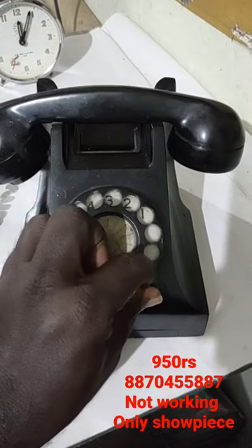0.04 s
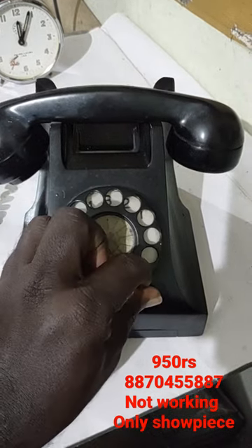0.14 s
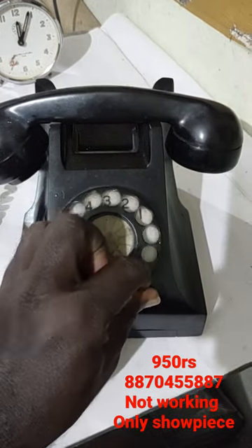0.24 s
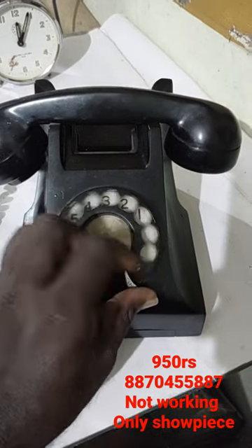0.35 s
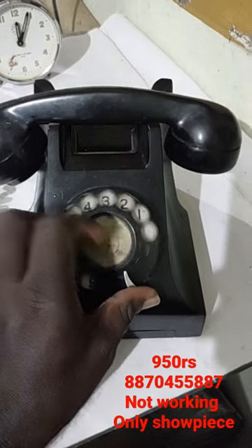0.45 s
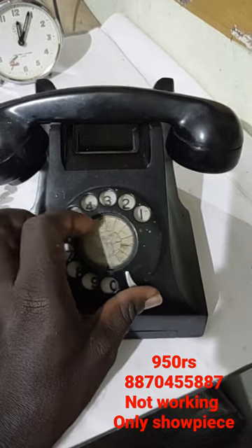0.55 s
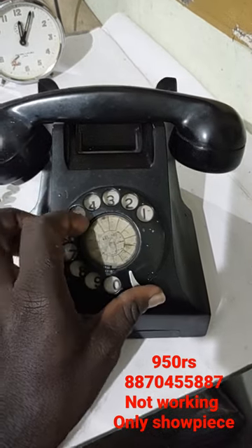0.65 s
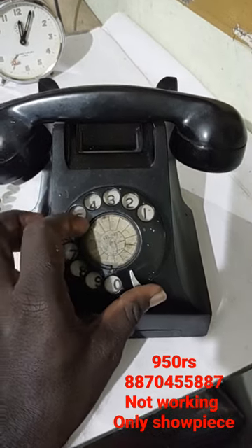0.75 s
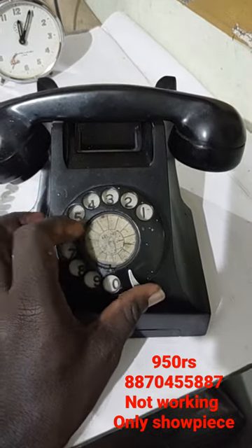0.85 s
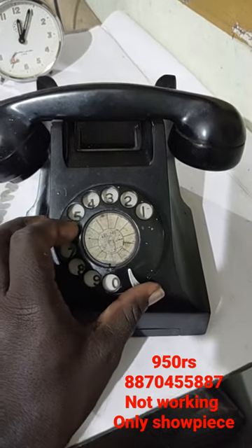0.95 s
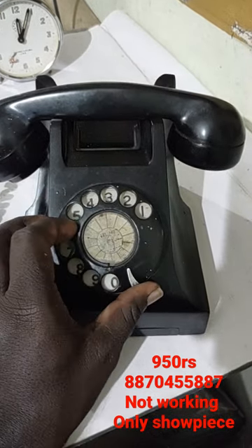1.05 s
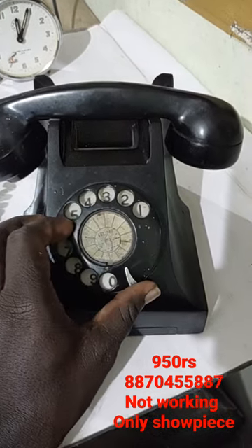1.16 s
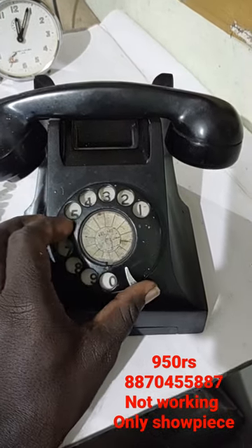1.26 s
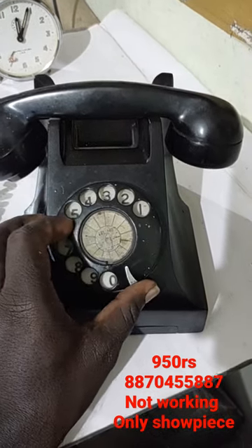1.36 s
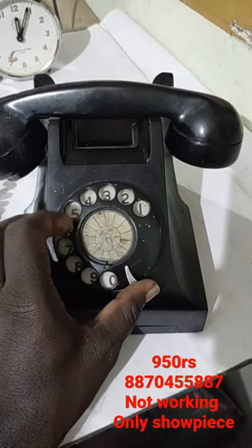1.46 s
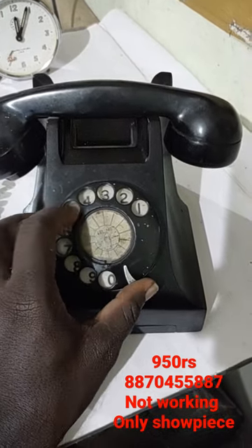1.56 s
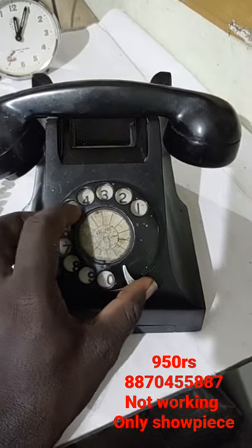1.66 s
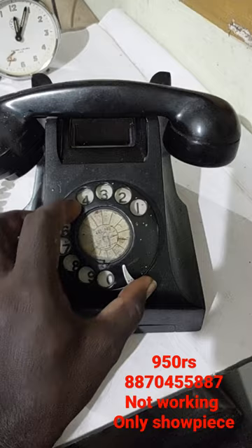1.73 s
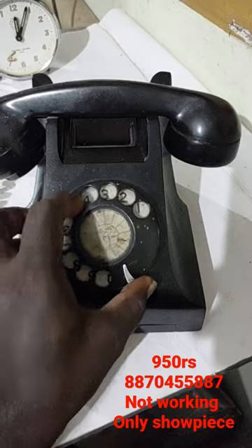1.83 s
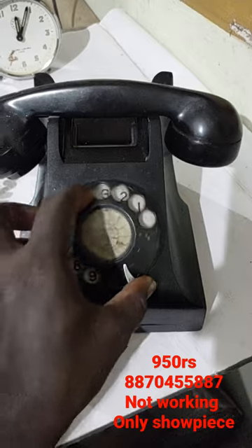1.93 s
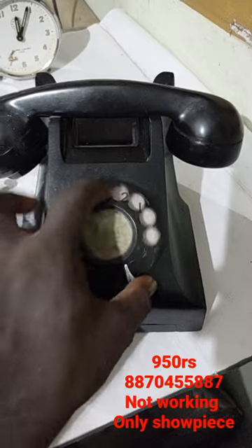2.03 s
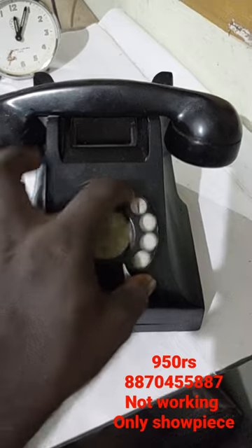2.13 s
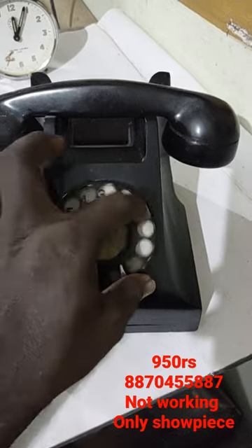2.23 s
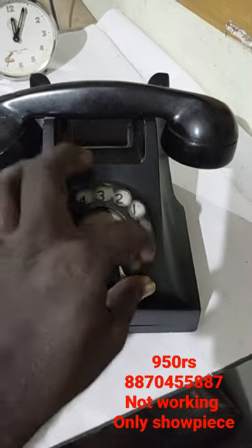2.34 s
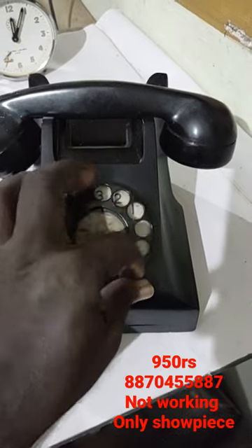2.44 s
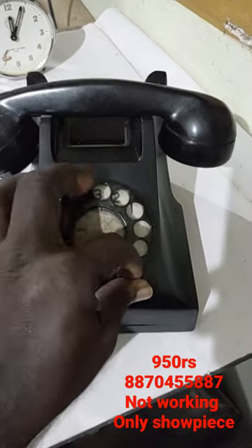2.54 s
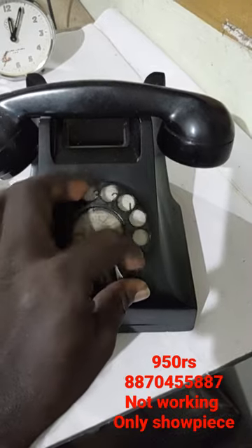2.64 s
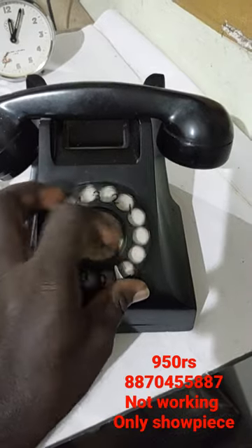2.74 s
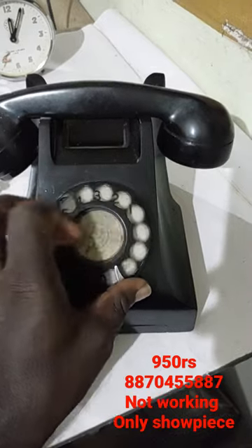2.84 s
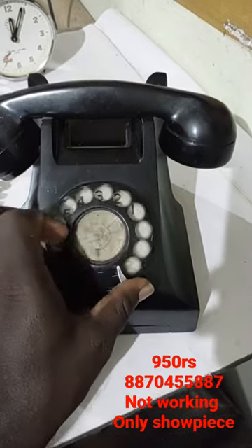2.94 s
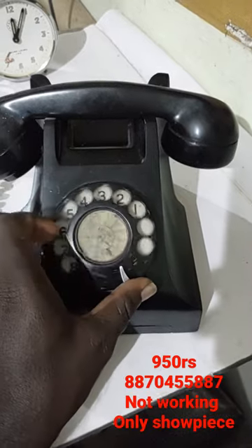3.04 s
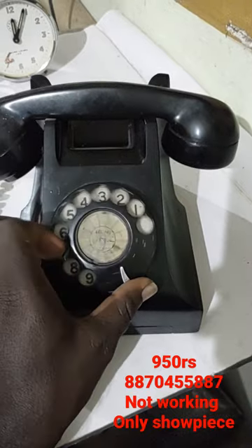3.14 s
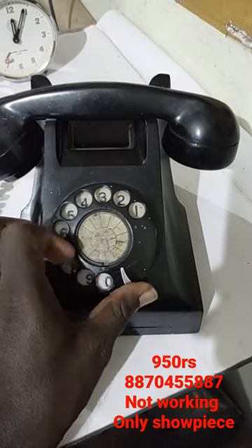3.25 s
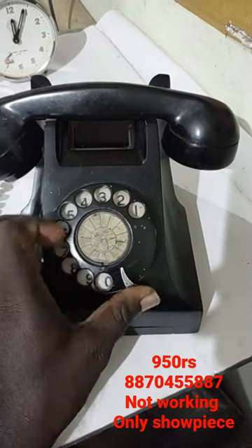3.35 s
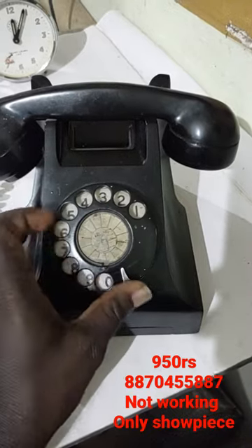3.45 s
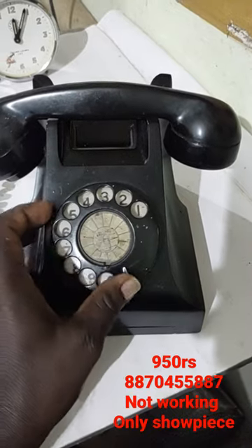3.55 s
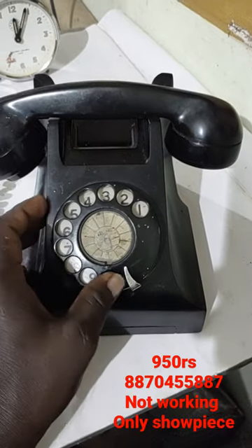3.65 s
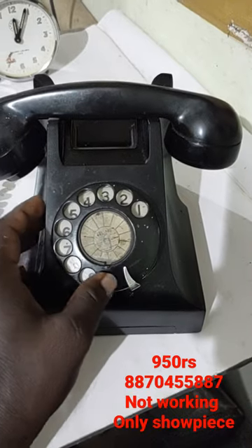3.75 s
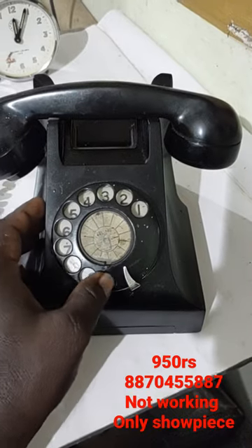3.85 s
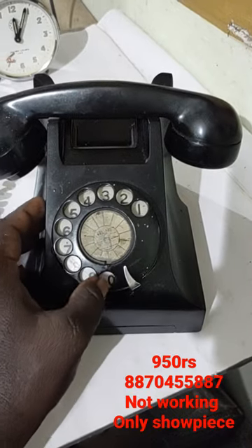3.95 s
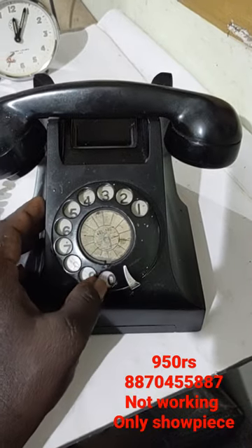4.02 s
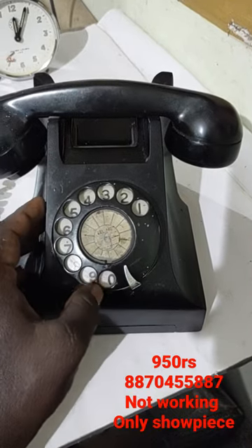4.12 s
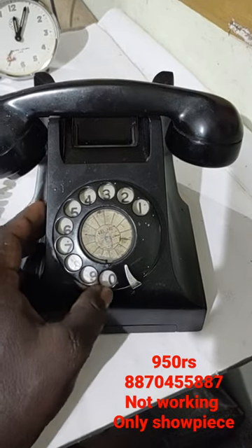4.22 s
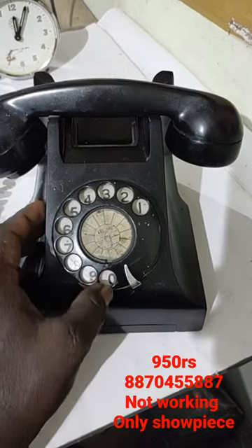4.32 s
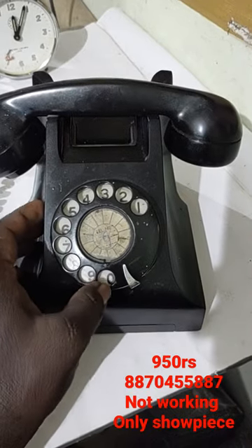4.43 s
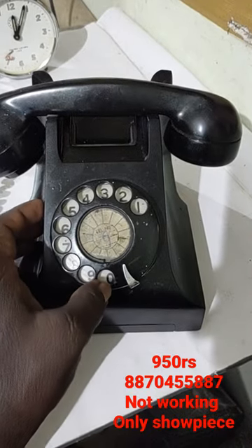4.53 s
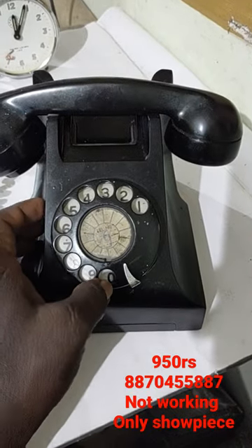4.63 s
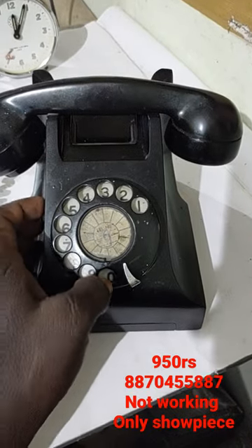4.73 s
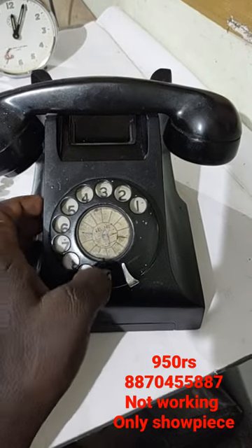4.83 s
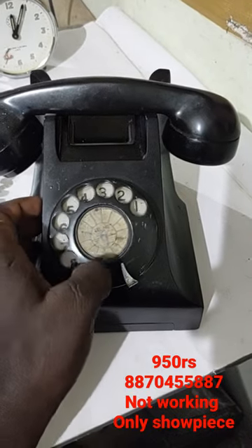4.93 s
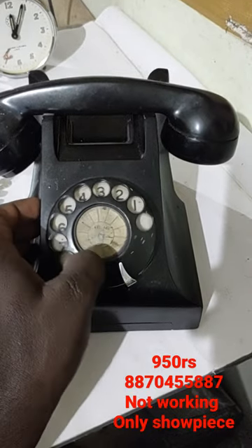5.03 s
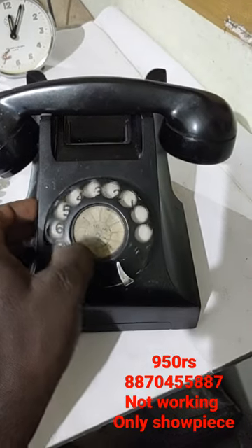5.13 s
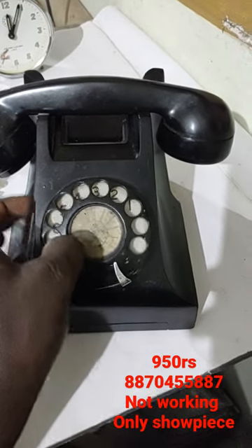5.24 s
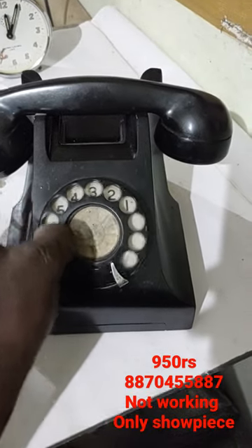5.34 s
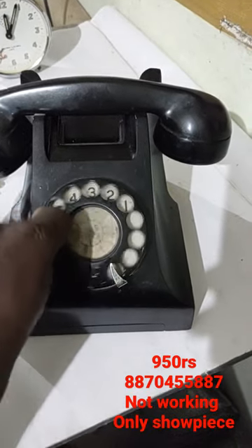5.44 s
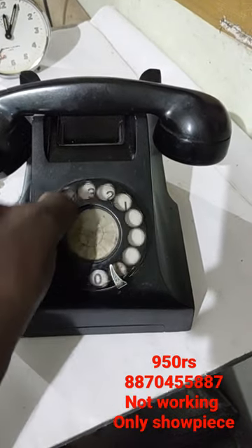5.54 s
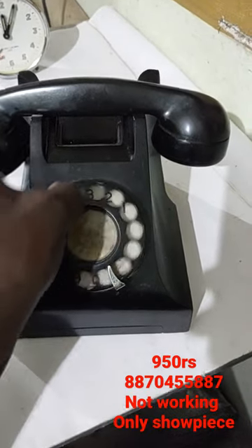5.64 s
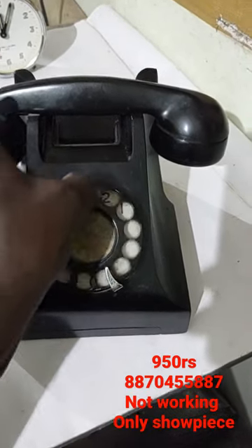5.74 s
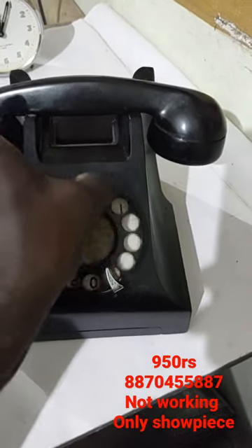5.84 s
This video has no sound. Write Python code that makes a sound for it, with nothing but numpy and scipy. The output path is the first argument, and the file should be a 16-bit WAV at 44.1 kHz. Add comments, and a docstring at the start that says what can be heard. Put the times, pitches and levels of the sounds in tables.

```python
"""A desk in a small, quiet room: the dial of an old bakelite telephone is wound and let go.
Winding drags a spring pawl over ratchet teeth, the clicks thinner and brighter as the spring tightens.
Running back, the governor rubs and flutters in the ringing case until the wheel knocks on its stop.
The pawl spring pings and the phone thuds softly on the desk, over faint room noise and mains hum."""
import sys
import numpy as np
from scipy import signal
from scipy.fft import rfft, irfft
from scipy.io import wavfile

SR = 44100
rng = np.random.default_rng(int(sys.argv[2]) if len(sys.argv) > 2 else 0)


def materialize(psi):
    """Save the field psi as 16-bit PCM at rate SR to the path in sys.argv[1].

    A 1-D psi becomes a single channel; in a 2-D psi each row is a channel.
    """
    bounded = np.clip(np.atleast_2d(psi).T, -1, 1)
    quanta = np.round(bounded * 32767).astype(np.int16)
    wavfile.write(sys.argv[1], SR, quanta)


N = 259308
TIME = np.arange(N) / SR
CUTOFF_HZ = 16300
LEAD_S = .0018   # a blow's treble arrives this much early

# Resonances of the phone's parts: f/Hz, width/Hz, gain/dB, left-right/dB
SNAP_MODES = [(2516, 380, 1, 7.5), (2822, 720, -9, 9)]   # the pawl spring's low snap
SCRAPE_MODES = [(8200, 3700, -25, 9.6), (9300, 1650, -19.5, 16.3), (13900, 6100, -19, 3),
                (15700, 2100, -17, 6.7)]   # its bright scrape
WHEEL_MODES = [(1220, 2000, -21.5, -3), (1679, 63, -8, 12), (2078, 73, -4.5, 7)]   # finger wheel
CASE_MODES = [(239, 125, -10.5, 2), (360, 13.6, 3.5, 0), (403, 43, -5.5, 4), (520, 67, -5.5, 4),
              (807, 76, -8.5, -6)]   # bakelite case
PLATE_MODES = [(1170, 1540, -13, 1.2), (1664, 34, -6.5, 19), (1712, 57, 0, 1.7), (1808, 59, -5.5, 22),
               (2028, 24, 1, 4.9), (2123, 58, -1, 13), (2368, 89, -3.5, 5.1)]   # dial plate
PARTS_MODES = [(3725, 98, 0, 12.5), (4180, 280, 0.5, 6), (5250, 150, -5, 25.5), (5315, 310, -2.5, 5),
               (6140, 240, 3.5, 3), (6600, 193, 0, 9), (9770, 2700, -5.5, 6), (9830, 790, -5, 7),
               (11700, 2700, -17, 3)]   # small parts


def ratchet(grit=0.66, grit_s=0.0019, play=0.36, play_s=0.0029):
    """Winding clicks: each slip off a tooth sends a bending wave down the pawl spring."""
    # pawl slips: t/s, level/dB, spring tension/0-1
    slips = [(0.04, 0, 0.36), (0.1303, 0, 0.46), (2.0545, -2, 0.3), (2.1552, 0, 0.3), (2.2359, 0, 0.4),
             (2.3138, -0.5, .4), (2.3765, 0, 0.63), (2.4274, -1.5, 0.72), (2.5070, -1.5, 0.48),
             (5.1281, -2, 0.33), (5.2819, -1.5, 0.65), (5.434, -1.5, 0.84), (5.5473, -0.5, 0.9),
             (5.698, -0.5, 1), (5.8223, -2.5, 1)]
    # drive to wheel, snap, ring and scrape: a tighter spring clicks thinner and brighter
    slack_db = np.array([2.5, 2.5, -5, -6])
    tension_adds_db = np.array([-8.5, -6.5, 6, 4])
    forces = np.zeros((4, N))
    for s, db, tension in slips:
        at = round((s - LEAD_S) * SR)
        # the tooth's rough flank and the play in the gears make every slip different
        slip = (bending_wave() + grit * chatter(grit_s) + play * chatter(play_s))[:N - at]
        drive = from_db(db + slack_db + tension_adds_db * tension)
        forces[:, at:at + len(slip)] += drive[:, None] * slip
    wheel = band(resonate(forces[0], WHEEL_MODES), 430, 2300)
    snap = band(resonate(forces[1], SNAP_MODES), 2560, 3200)
    # the pawl spring's high ring: f/Hz, width/Hz, gain/dB, left-right/dB
    ring_modes = [(3777, 156, -1.5, 7.3), (4020, 1870, -11, 6), (5430, 340, -14, 20),
                  (6250, 350, -18, 17.6)]
    ring = band(resonate(forces[2], ring_modes), 2430, 6000)
    scrape = resonate(forces[3], SCRAPE_MODES, left_lag_s=0.000379)
    return wheel + snap + ring + scrape


def governor(turn_hz=104, wander=0.027, grain_db=1.95, wobble_db=0.86, stall_speed=0.082):
    """The whirr: spinning weights rub their cup, harder once a turn, and shake plate and case."""
    # governor cup: f/Hz, width/Hz, gain/dB, left-right/dB
    cup_modes = [(2610, 114, 2, 3.4), (2432, 180, -4, 17), (2762, 62, -6, 14.6), (2790, 180, -9.5, 10.2)]
    turns = np.cumsum(turn_hz * (1 + wander * drift(7.3))) / SR
    speed = dial_speed()
    flutter_db = 2 + 1.5 * speed ** 2
    pressure_db = flutter_db * np.cos(2 * np.pi * turns) + grain_db * drift(550) + wobble_db * drift(21)
    rub = from_db(pressure_db) * rng.standard_normal(N)
    plate = band(resonate(rub, PLATE_MODES), 1250, 2600, order=3)
    drone = resonate(rub, CASE_MODES, left_lag_s=0.00025)
    cup = band(resonate(rub, cup_modes), 2700, 3300, order=3)
    hiss = band(resonate(rub, PARTS_MODES, left_lag_s=0.000385), 2000, 8900)
    touching = speed ** 2 / (speed ** 2 + stall_speed ** 2)   # slow weights fall away from the cup
    # each layer grows with speed: sound, level at full speed/dB, exponent
    layers = [(plate, -39.5, 1.14), (drone, -47.5, 1.12), (cup, -43, 1.8), (hiss, -55.5, 0.4)]
    return touching * sum(rms_one(layer) * from_db(db) * speed ** power for layer, db, power in layers)


def dial_speed(spin_up_s=0.22):
    """Once let go, the spring drives the dial towards a limit until it is braked; 1 is full speed."""
    # return runs: release t/s, brake t/s, braking decay/s, starting speed/0-1, limit speed/0-1
    runs = [(0.348, 0.637, 0.02, 0.37, 0.69), (2.693, 3.296, 0.051, 0.03, 0.9)]
    speed = np.zeros(N)
    for release_s, brake_s, braking_s, first, limit in runs:
        gathered = limit + (first - limit) * np.exp(-np.maximum(TIME - release_s, 0) / spin_up_s)
        braking = np.exp(-np.maximum(TIME - brake_s, 0) / braking_s)
        speed += (TIME > release_s) * gathered * braking
    return speed


def wheel_knocks(rebound_s=.0023, rebound_db=-7.5, bounce=0.49, bounce_s=0.0016, rattle_s=0.023):
    """The wheel hits a stop or catches, then rebounds; hard hits set plate and small parts rattling."""
    # knocks: t/s, level/dB, hardness/dB
    knocks = [(0.3520, 1, -4.5), (0.6209, -13, -25), (2.6867, -14.5, -6), (3.1742, -9, -13),
              (3.245, -11, -11), (3.2625, -7, -34), (3.3331, -1.5, -4.5)]
    force, hard_force, rattle = np.zeros((3, N))
    for s, db, hard_db in knocks:
        onset = s - LEAD_S
        contact = bending_wave() + bounce * chatter(bounce_s)
        blow = blows([onset, onset + rebound_s], [db, db + rebound_db], contact)
        force += blow
        hard_force += from_db(hard_db) * blow
        rattle += blows([s], [db + hard_db], chatter(rattle_s))
    body = from_db(2) * resonate(force, CASE_MODES)
    wheel = from_db(18) * band(resonate(force, WHEEL_MODES), 690, 2080)
    snap = from_db(4.5) * band(resonate(force, SNAP_MODES), 850, 3300)
    scrape = from_db(5.5) * resonate(hard_force, SCRAPE_MODES)
    plate = from_db(4) * band(resonate(rattle, PLATE_MODES), 670, 2200, order=3)
    shaking = low_pass(from_db(0.5) * hard_force + from_db(-11) * rattle, 11200, order=3)
    parts = resonate(shaking, PARTS_MODES, left_lag_s=0.000378)
    return body + wheel + snap + scrape + plate + parts


def spring_pings():
    """A soft, clean pluck rings only the pawl spring's lowest modes."""
    # plucks: t/s, level/dB
    plucks = [(0.3448, -1), (5.529, 3)]
    force = blows(*np.transpose(plucks), shape=[1])
    return band(resonate(force, SNAP_MODES), 2450, 3200)


def low_thuds(level_db=-1.5, contact_s=0.00044, repeat_s=0.0214, repeat_db=-7.5):
    """Soft low thuds, each a double pulse that rings the phone on its desk."""
    # thuds: t/s, level/dB
    thuds = [(0.353, 0.5), (0.526, -3), (2.081, 3), (4.971, -2)]
    # the phone on its desk: f/Hz, width/Hz, gain/dB, left-right/dB
    desk_modes = [(109, 4.2, 8.5, 2), (182, 23, 2, -2), (204, 5, 0.5, 0.5)]
    age = TIME[:SR // 20]
    pulse = age * np.exp(-2 * np.pi * age / contact_s)
    s, db = np.transpose(thuds)
    force = blows(np.r_[s, s + repeat_s], np.r_[db, db + repeat_db], pulse / pulse.sum())
    return from_db(level_db) * resonate(force, desk_modes)


def near_scatter(x, gain_db=-8, t60=0.0056, gap_s=.0004, above_hz=4500):
    """Hand, handset and desk scatter the treble within milliseconds, differently to each side."""
    scattered = reflect(x, rng.standard_normal((2, SR // 20)), t60, gap_s)
    return from_db(gain_db) * band(scattered, above_hz, CUTOFF_HZ, order=3)


def walls(x, gain_db=-7.5, t60=0.19, bright=0.11, gap_s=0.0024):
    """A short, dense room tail; treble beams past the listener and returns strongest."""
    cloud = signal.lfilter([1, -bright], [1], rng.standard_normal((2, int(t60 * SR))))
    return from_db(gain_db) * reflect(x, cloud, t60, gap_s)


def room_air():
    """Steady room rumble and wide hiss, the level drifting slowly as with an automatic gain."""
    # spectra of the rumble and the hiss: f/Hz, relative level/dB
    rumble = [(20, -50), (45, -27), (80, -6.5), (160, -4.5), (330, -5.5), (550, -0.5)]
    hiss = [(780, -10.5), (2500, -11.5), (3100, -20.5), (3700, -16.5), (5000, -26.5), (8000, -32),
            (16000, -36.5)]
    # stereo image: f/Hz, likeness of the sides/0-1, left-right/dB
    image = [(124, 0.85, -3.5), (290, 1, 3), (600, 0.44, 0.5), (1490, 0.013, 3.5), (2460, 0, 8),
             (4260, 0.016, 4.5), (11800, 0, 0.5)]
    # slow gain drift: t/s, level/dB
    gain_curve = [(0, -59), (.75, -58.5), (1.2, -61.5), (1.9, -62), (2.6, -58.5), (3.5, -57.5), (4.3, -61),
                  (5.88, -58.5)]
    log_hz = np.log(np.maximum(np.fft.rfftfreq(N, 1 / SR), 1))
    hz, db = np.transpose(rumble + hiss)
    colour = from_db(np.interp(log_hz, np.log(hz), db))
    hz, alike, pan_db = np.transpose(image)
    alike = np.interp(log_hz, np.log(hz), alike)
    balance = panned(np.interp(log_hz, np.log(hz), pan_db))
    width = np.sqrt((1 - alike) / (1 + alike))
    mid, side = rfft(rng.standard_normal((2, N)))
    stereo = mid + width * side * [[1], [-1]]
    air = rms_one(irfft(stereo * colour * balance, N))
    return air * from_db(np.interp(TIME, *np.transpose(gain_curve)))


def room_boom(level_db=-63.5):
    """Noise keeps the room's low resonances faintly ringing."""
    # room resonances: f/Hz, width/Hz, gain/dB, left-right/dB
    room_modes = [(178, 31, -10, 1.5), (259, 27, -7, -2), (488.2, 37.7, -7, 7.5)]
    return from_db(level_db) * rms_one(resonate(rng.standard_normal(N), room_modes))


def mains_hum(waver=0.067):
    """The mains tone and its stronger octave, wavering slightly in level."""
    # hum partials: f/Hz, level/dB
    partials = [(50, -89), (100, -72)]
    hum = sum(from_db(db) * np.sqrt(2) * np.sin(2 * np.pi * hz * TIME) for hz, db in partials)
    return hum * (1 + waver * drift(27))


def bending_wave(spread_s=.0021):
    """Thin metal carries treble fastest, smearing a blow into a tiny falling chirp; energy 1."""
    to_go = np.maximum(1 - TIME[:SR // 15] / spread_s, 0)
    chirp = np.sin(np.pi * CUTOFF_HZ * spread_s * to_go ** 2)
    return chirp / np.linalg.norm(chirp)


def chatter(decay_s):
    """A short swell of random micro-contacts that dies away; energy about 1."""
    age = TIME[:SR // 15]
    burst = np.sqrt(age) * np.exp(-age / decay_s)
    return burst / np.linalg.norm(burst) * rng.standard_normal(len(age))


def blows(times, levels_db, shape):
    """One force shape laid down at each time."""
    clicks = np.zeros(N)
    clicks[np.round(np.asarray(times) * SR).astype(int)] = from_db(levels_db)
    return signal.fftconvolve(clicks, shape)[:N]


def resonate(force, modes, left_lag_s=.0001):
    """Parallel resonances of alternating sign, each panned; the left side hears them a little later."""
    out = np.zeros((2, N))
    for k, (hz, width, db, pan_db) in enumerate(modes):
        r = np.exp(-np.pi * width / SR)
        poles = [1, -2 * r * np.cos(2 * np.pi * hz / SR), r * r]
        ring = signal.lfilter([1, 0, -1], poles, force + 1e-18)
        out += (-1) ** k * (1 - r * r) / 2 * from_db(db) * panned(pan_db) * ring
    out[0] = np.interp(TIME - left_lag_s, TIME, out[0])
    return out


def reflect(x, noise, t60, gap_s):
    """Stereo noise, shaped into a dying cloud of reflections, echoes x after a short gap."""
    age = TIME[:noise.shape[1]]
    tail = noise * from_db(-60 * age / t60) * (age > gap_s)
    tail /= np.linalg.norm(tail, axis=1, keepdims=True)
    return signal.fftconvolve(x, tail, axes=1)[:, :N]


def drift(hz):
    """Random wander below hz, rms 1."""
    return rms_one(low_pass(rng.standard_normal(2 * N), hz)[N:])


def band(x, low_hz, high_hz, order=2):
    """Butterworth band-pass."""
    return signal.sosfilt(signal.butter(order, [low_hz, high_hz], "band", fs=SR, output="sos"), x)


def low_pass(x, hz, order=2):
    """Butterworth low-pass."""
    return signal.sosfilt(signal.butter(order, hz, fs=SR, output="sos"), x)


def panned(db):
    """Left and right gains for a level difference."""
    return from_db(np.array([[.5], [-.5]]) * db)


def from_db(db):
    """Decibels to gain."""
    return 10 ** (np.asarray(db) / 20)


def rms_one(x):
    """Scale to rms 1."""
    return x / np.sqrt(np.mean(x ** 2) + 1e-20)


def scene():
    """The dial up close with its reflections, low thuds, and room tone underneath."""
    dial = ratchet() + spring_pings() + wheel_knocks() + governor()
    reflections = near_scatter(dial) + walls(dial)
    room_tone = room_air() + room_boom() + mains_hum()
    return dial + reflections + low_thuds() + room_tone


def record(dry):
    """A steep low-pass takes off the very top."""
    return signal.sosfilt(signal.ellip(10, .1, 70, CUTOFF_HZ, fs=SR, output="sos"), dry)


dry = scene()
out = record(dry)
materialize(out)
```